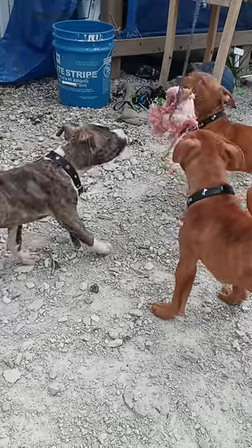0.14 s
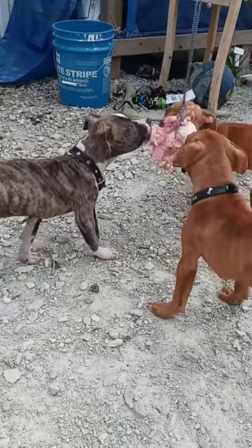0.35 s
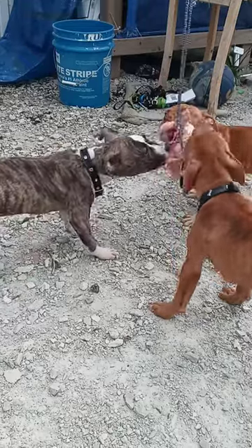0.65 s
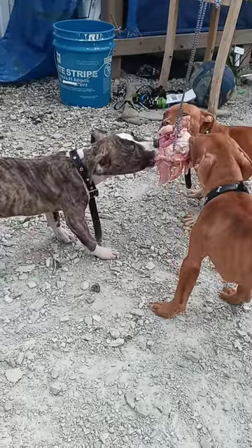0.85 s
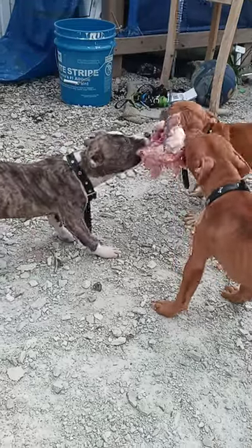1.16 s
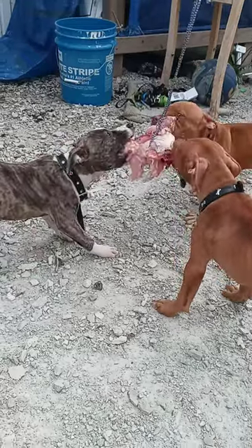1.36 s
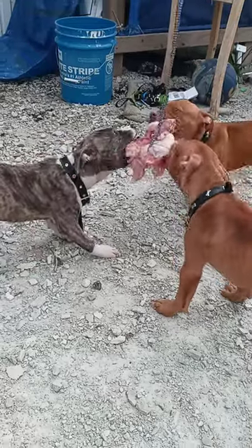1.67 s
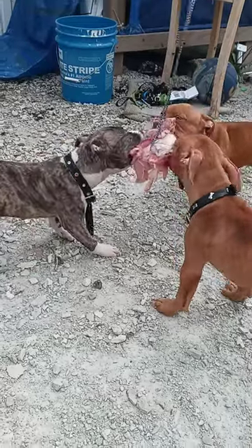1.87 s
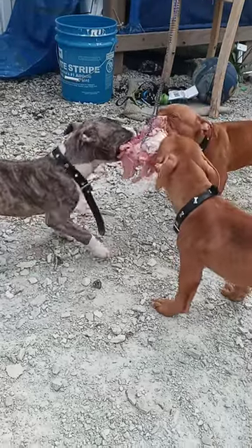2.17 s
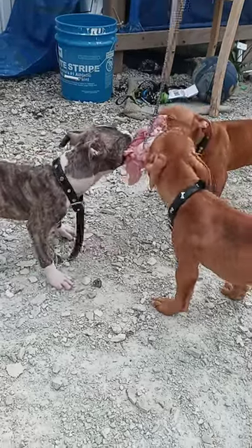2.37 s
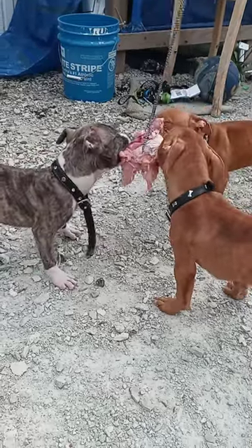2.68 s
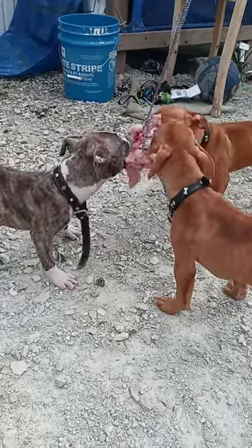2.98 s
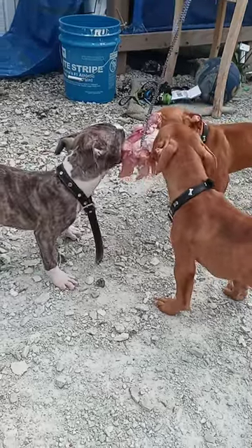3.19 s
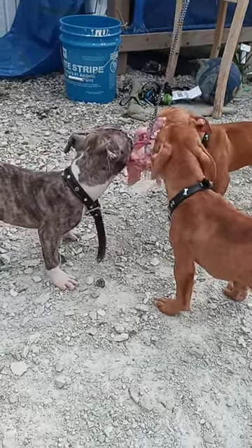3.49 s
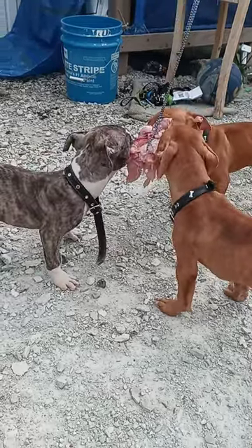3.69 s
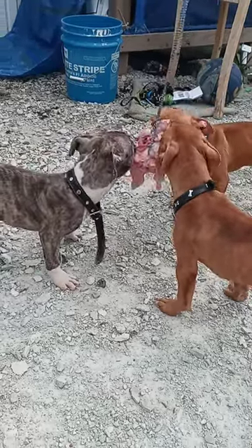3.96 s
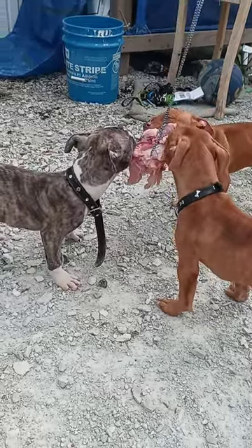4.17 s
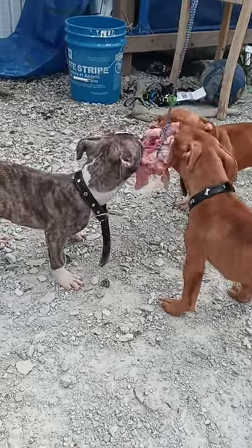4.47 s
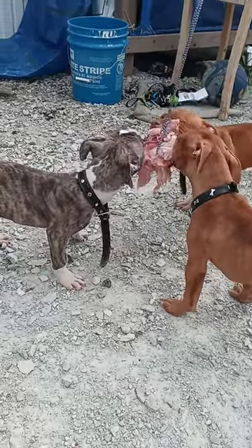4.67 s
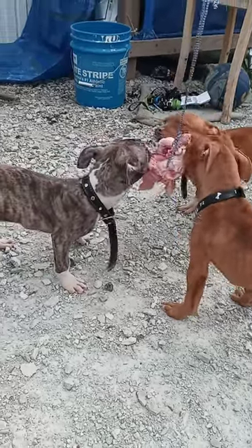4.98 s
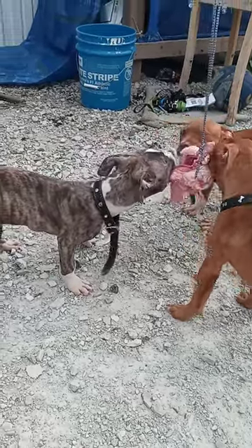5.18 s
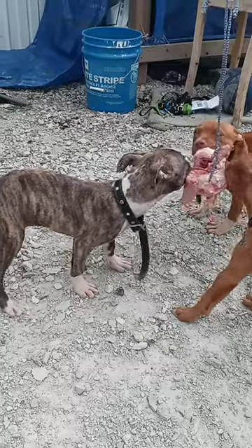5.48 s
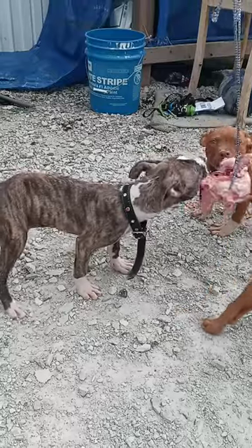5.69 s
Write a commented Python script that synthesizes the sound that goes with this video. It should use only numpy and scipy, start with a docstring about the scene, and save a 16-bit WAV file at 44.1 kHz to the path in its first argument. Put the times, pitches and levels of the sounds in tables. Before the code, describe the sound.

Outdoors, a low lumpy rumble with passing engine drones and a midrange wash continue under close, wet puppy feeding. A busy burst of smacks and rasps comes early, pops cluster around two seconds, and a sharp smack and two chain clinks follow. A loud hollow pop stands out just after three seconds; chewing continues, ending with longer gritty scuffs. The microphone is near, the space open and barely reflective.

```python
"""A far rumble with passing engine drones, a midrange wash and a fine hiss run throughout: shaped noise
and wavering sines. From the start, too, paws rub grit and puppies gnaw and crackle a raw chicken: grains.
Then come smacks (bursts in bands of noise), tearing rasps (clumped grains), mouth pops (short sagging sines)
with bubbling froth, and wet squeaks (bending whistles). Around the middle, the chain that holds the chicken
clinks twice (decaying partials). The yard adds one echo and a short scatter to nearby sounds, save the gnawing."""
import sys
import numpy as np
from scipy import signal
from scipy.fft import rfft, irfft
from scipy.io import wavfile
from scipy.ndimage import uniform_filter1d

SR = 44100
rng = np.random.default_rng(int(sys.argv[2]) if len(sys.argv) > 2 else 0)


def log_audio(samples):
    """Write samples as a 16-bit WAV file to the path given in sys.argv[1]."""
    # one column per channel
    frames = np.atleast_2d(samples).T
    # limit to full scale, then quantise
    limited = np.clip(frames, -1, 1)
    pcm = np.round(limited * 32767).astype(np.int16)
    wavfile.write(sys.argv[1], SR, pcm)


N = 257544
TIME = np.arange(N) / SR  # s

# Spectrum levels are relative; event levels precede the high-pass, yard and microphone colour.
# Far traffic rumble: t/s, level/dB before the rumble trim
RUMBLE_LEVEL = [(0, -44.5), (1, -47.5), (2.2, -45.5), (4.1, -45.5), (5.2, -47), (5.84, -46)]
# Upper edge of the rumble: t/s, rms level/dB
UPPER_RUMBLE_LEVEL = [(0, -67), (1, -76), (2.2, -71.5), (3.1, -63.5), (4.5, -67.5), (5.2, -77), (5.84, -79)]
# Far engines swelling and fading: one end t/s, other end t/s, f/Hz, rms level/dB at full swell before throb
ENGINE_DRONES = [(0.55, 0.28, 119, -53), (0.43, .65, 99, -52.5), (1.4, 1.1, 153, -57), (0.8, 1.12, 98, -56),
                 (1.7, 1.6, 101.5, -47.5), (2.06, 2.29, 100, -52), (1.7, 2.9, 152.5, -55),
                 (1.9, 2.6, 150, -57), (3, 3.3, 100.4, -52), (1.5, 3.7, 176.5, -56),
                 (3.5, 4.67, 131.5, -47.5), (3.5, 4.0, 139.5, -47.5), (3.5, 5.25, 65, -58.5),
                 (4, 5.02, 176, -52.5), (5, 6, 130, -60), (3.5, 6.8, 100, -62)]
# Spectrum of the rumble: f/Hz, level/dB
RUMBLE_SPECTRUM = [(20, -39), (40, -19.5), (65, -5.5), (110, 1), (170, -1), (250, -6), (350, -13.5),
                   (500, -34), (800, -46), (2000, -81)]
# Distant midrange wash: t/s, rms level/dB
WASH_LEVEL = [(0.0, -52), (1.97, -54), (2.52, -52), (3.76, -53), (4.18, -52), (5.61, -54), (5.84, -52.5)]
# Dull lower edge of the wash: t/s, rms level/dB
DULL_LEVEL = [(0, -66.5), (.45, -71), (.7, -73), (1.9, -68), (2.25, -66), (2.55, -62.5), (2.9, -73),
              (3.3, -72.5), (4.1, -71.5), (4.6, -84), (5.2, -65), (5.45, -85), (5.84, -82)]
# Spectrum of the midrange air: f/Hz, level/dB
AIR_SPECTRUM = [(300, -41), (600, -15), (760, -7), (930, 6), (1500, 3.5), (1750, 4), (2050, -7.5),
                (2550, -12.5), (2900, -8), (4300, -15.5), (7000, -37), (11000, -67)]
# Spectrum of the fine hiss: f/Hz, level/dB
HISS_SPECTRUM = [(1500, -30), (4000, -10), (5500, -6), (7000, -4), (8000, 2), (9000, -2), (9800, -9),
                 (10600, -14), (16000, -15)]
# Grit shifting under paws: t/s, level/dB before the shuffle boost
GRIT_LEVEL = [(0.0, -62.5), (0.49, -56.5), (0.68, -63.5), (0.97, -65), (1.69, -63.5), (2.03, -76),
              (2.26, -63), (2.36, -60.5), (2.96, -70.5), (3.38, -62.5), (3.66, -79), (3.89, -69),
              (4.31, -63), (4.49, -70), (5.19, -65.5), (5.45, -61), (5.66, -60), (5.84, -58)]
# Spectrum of the grit: f/Hz, level/dB
GRIT_SPECTRUM = [(1500, -32), (3000, -5.5), (6000, 0), (9000, 0.5), (12000, 1), (16000, 5.5)]
# Wet rustle of gnawing, with lulls between bouts: t/s, rms level/dB
GNAWING_LEVEL = [(.1, -60.5), (.25, -68), (.45, -59), (.55, -78), (.8, -67), (1.02, -67), (1.18, -63),
                 (1.3, -59), (1.44, -70), (1.68, -59), (1.83, -69), (1.93, -60), (2.04, -57.5), (2.11, -69),
                 (2.22, -62), (2.65, -65), (2.9, -66), (3.06, -61), (3.3, -59.5), (3.48, -73), (3.9, -60.5),
                 (4.15, -63), (4.35, -65), (4.55, -62.5), (4.9, -56.5), (5.1, -65.5), (5.42, -59),
                 (5.84, -70)]
# Spectrum of that rustle: f/Hz, level/dB
RUSTLE_SPECTRUM = [(1700, -28), (2350, -3), (2900, 0), (3600, -3.5), (4400, -6), (6500, -6), (10000, -17),
                   (16000, -42)]
# Smacks of lips, teeth and gristle: t/s, short-term peak level/dB before trim, centre f/Hz, spread/octaves each way
LIP_SMACKS = [(0.057, -46, 4450, 0.71), (.3426, -40, 9000, .6), (0.346, -36, 2500, 1.1),
              (0.3685, -34.5, 6000, 1.1), (.3835, -37, 7000, 1), (0.4238, -33.5, 5900, 0.68),
              (0.447, -33, 8300, 0.76), (.467, -49, 8500, 1), (0.4954, -39.5, 6300, 0.24),
              (.5741, -43, 9200, 0.55), (0.6608, -41.5, 3300, .9), (.6695, -42, 5000, 0.55),
              (0.6813, -39, 6700, 0.27), (0.862, -45, 5200, 0.69), (0.9667, -47, 5000, 0.61),
              (1.229, -44.5, 7200, .4), (1.2346, -33.5, 3180, 0.49), (1.3493, -46, 4560, .4),
              (1.3624, -42, 2700, .7), (1.362, -38.5, 6200, 0.38), (1.3785, -43, 6600, .5),
              (1.4187, -48, 4300, 0.62), (1.466, -49, 4900, 0.53), (1.4895, -44, 8240, .6),
              (1.526, -41.5, 4270, 0.36), (1.593, -35.5, 7000, 0.47), (1.723, -42.5, 4400, 0.38),
              (1.774, -47.5, 4200, 1), (1.9684, -44, 3830, 0.65), (1.974, -38.5, 6670, 0.57),
              (2.0337, -49, 3200, .6), (2.234, -43, 4600, .8), (2.291, -47, 3700, .4),
              (2.481, -40, 3770, 0.33), (2.5414, -25, 6200, 1.03), (2.5407, -36.5, 1260, 0.52),
              (2.6, -31.5, 8900, 0.37), (2.722, -35.5, 9600, .22), (2.781, -38, 8500, .4),
              (2.860, -41, 10500, 0.44), (2.9842, -35, 4000, 1.34), (3.0945, -47, 5000, .7),
              (3.1614, -35, 5370, 0.91), (3.2216, -36, 6230, .5), (3.2986, -48, 3700, 0.69),
              (3.455, -45, 5500, 1.1), (3.5404, -47, 8100, 0.42), (3.6935, -46.5, 3300, 0.36),
              (3.6413, -43.5, 7000, 0.46), (3.706, -38, 6700, 0.3), (3.885, -44, 4600, 0.7),
              (3.9404, -40.5, 4860, 0.56), (3.977, -40.5, 6400, 0.96), (4.061, -40.5, 8900, 0.41),
              (4.0813, -31.5, 4200, 1.8), (4.082, -37.5, 4700, 0.15), (4.123, -45, 4000, 0.88),
              (4.212, -44.5, 3800, 0.31), (4.2457, -53, 3200, .3), (4.358, -45, 5440, 0.22),
              (4.3897, -42.5, 4970, 0.62), (4.4537, -47, 4800, 0.082), (4.4628, -44, 9340, .2),
              (4.7658, -36, 5100, 0.25), (4.844, -43.5, 6340, 0.62), (4.9127, -49, 6300, 0.27),
              (4.9407, -35, 4670, 1.7), (5.053, -43, 6000, 1.1), (5.2357, -42, 6100, 0.35),
              (5.2552, -41.5, 7600, .8), (5.2932, -42, 5200, 1.2), (5.3051, -34, 5300, 0.46),
              (5.321, -42, 6200, 1.1), (5.6695, -35, 8700, 0.28), (5.746, -38, 6300, 1.4),
              (5.792, -44, 4200, .6)]
# Tearing meat and scuffed grit: t/s, length/s, rms level/dB, centre f/Hz, spread/octaves each way
TEARING_RASPS = [(.328, .066, -54.5, 1150, 0.4), (0.334, 0.037, -47, 5600, 1.1),
                 (0.368, 0.033, -45, 5600, 1.2), (0.354, 0.14, -66, 650, 0.4),
                 (0.39, 0.016, -50, 5500, 1.2), (0.408, 0.03, -52.5, 7000, .9),
                 (0.662, 0.031, -52, 5030, 0.5), (.815, 0.022, -53.5, 10000, .6),
                 (0.828, 0.051, -53.5, 4440, 0.4), (1.233, 0.023, -54.5, 1200, 0.42),
                 (1.239, .015, -58, 2900, 0.72), (1.255, .012, -47.5, 6000, 1.2),
                 (1.266, 0.014, -53, 7600, .6), (1.679, 0.048, -55.5, 4000, .8),
                 (1.761, 0.026, -52, 4970, 0.71), (2.185, 0.021, -51, 6500, 1.1),
                 (2.262, 0.028, -47, 9500, 0.68), (2.553, 0.014, -52, 4200, 1),
                 (2.714, .012, -51, 10500, .25), (2.85, 0.016, -53, 10500, .45),
                 (3.168, 0.02, -54.5, 3900, 0.5), (3.224, 0.023, -59, 6000, 0.56),
                 (3.273, 0.017, -59.5, 2950, 0.22), (3.297, .02, -55.5, 3800, 0.55),
                 (3.82, 0.031, -54.5, 5000, 1.1), (4.266, 0.044, -56, 3600, 0.31),
                 (4.359, 0.033, -60, 5600, 0.5), (4.44, 0.043, -59.5, 1620, 0.16),
                 (4.774, 0.026, -49, 5070, 0.3), (4.792, 0.088, -58.5, 5000, 0.55),
                 (1.413, 0.021, -59, 4300, .6), (4.936, 0.036, -59, 4500, .8),
                 (5.302, 0.023, -52, 3000, 1.4), (5.655, 0.1, -51.5, 6500, 1.2),
                 (5.727, 0.25, -53.5, 5450, 1.2)]
# Hollow pops as suction lets go in a mouth: t/s, level/dB at full swell, cavity f/Hz, swell time/s
MOUTH_POPS = [(.6605, -46, 2860, .0016), (.778, -48, 3050, 0.0016), (0.785, -49, 3060, 0.0019),
              (1.2351, -32.5, 2960, 0.0011), (1.8991, -35.5, 1307, 0.0038), (1.9139, -34, 1230, 0.0013),
              (1.9152, -43, 3030, 0.0012), (1.9343, -36.5, 1270, 0.0014), (1.9338, -45, 2770, .0012),
              (2.182, -44.5, 2800, 0.0019), (2.3395, -38, 1380, 0.0019), (2.3464, -33, 1290, 0.0018),
              (2.5409, -33, 1190, 0.0012), (3.148, -40.5, 1440, 0.0025), (3.1593, -19.5, 1433, 0.0022),
              (3.172, -42, 1560, .0026), (3.864, -46, 2940, .0016), (3.977, -40.5, 1340, 0.0036),
              (4.0815, -41, 2420, 0.0012), (4.389, -35.5, 1400, 0.0026), (4.407, -45, 1440, 0.0037),
              (4.724, -44, 3400, 0.0022)]
# Air sucked past the meat: t/s, length/s, rms level/dB, start f/Hz, middle f/Hz, end f/Hz
WET_SQUEAKS = [(.728, .046, -61, 4400, 4400, 3850), (.776, .032, -62, 4100, 4600, 4900),
               (3.105, 0.035, -61, 4050, 4450, 4200)]
# Chain clinks as it is tugged: t/s, peak level/dB
CHAIN_CLINKS = [(2.7595, -22.5), (3.222, -36)]
# Partials of a chain link: f/Hz, relative level/dB, 60 dB decay time/s
LINK_PARTIALS = [(4840, -15, 0.047), (6250, -6, 0.058), (8050, -3, .033), (9507, -10, 0.023),
                 (11700, 2, .024), (15200, -2, .015)]
# Microphone colour on the nearby sounds: f/Hz, level/dB
MICROPHONE_COLOUR = [(1700, 3.5), (2350, 0.5), (2900, 5.5), (4200, -1.5), (7000, -1.5), (8300, 2),
                     (10000, -3), (16000, -7.5)]


def amp(db):
    """Turns decibels into gain."""
    return 10 ** (np.asarray(db) / 20)


def evened(x):
    """Scales a sound to rms 1."""
    return x / np.sqrt(np.mean(x ** 2) + 1e-20)


def curve(rows):
    """Joins (t/s, value) rows by straight lines."""
    return np.interp(TIME, *np.transpose(rows))


def add(mix, s, sound):
    """Mixes a sound in at time s, cut off at the end of the mix."""
    part = mix[max(round(s * SR), 0):][:len(sound)]
    part += sound[:len(part)]


def drift(per_s):
    """Slow random wander of rms 1, from noise smoothed above about per_s Hz."""
    count = N // 32  # a coarse time grid is enough
    smoothing = np.exp(-(np.fft.rfftfreq(count, N / count / SR) / per_s) ** 2)
    slow = irfft(rfft(rng.standard_normal(count)) * smoothing, count)
    return np.interp(TIME, np.linspace(0, N / SR, count), evened(slow))


def colour(x, points):
    """Filters by a (f/Hz, level/dB) spectrum, drawn straight over log frequency."""
    hz, db = np.transpose(points)
    log_bins = np.log(np.fft.rfftfreq(N, 1 / SR) + 1)
    return irfft(rfft(x) * amp(np.interp(log_bins, np.log(hz), db)), N)


def noise(points):
    """Noise of rms 1 with a (f/Hz, level/dB) spectrum."""
    return evened(colour(rng.standard_normal(N), points))


def band(x, hz, octaves, order=1):
    """One resonance, steeper with its order; appended silence lets it ring out."""
    ratio = 2 ** (abs(octaves) + .05)  # slightly widened, so no band is too narrow
    edges = np.clip([hz / ratio, hz * ratio], [50, 100], [SR * .4, SR * .48])
    sos = signal.butter(order, edges, "bandpass", fs=SR, output="sos")
    return signal.sosfilt(sos, np.pad(x, (0, 256)))


def thin(x, hz):
    """High-pass: tiny sources radiate no bass."""
    return signal.sosfilt(signal.butter(2, hz, "highpass", fs=SR, output="sos"), x)


def grains(size, per_s, spread_db):
    """Sparse clicks of random sign, a few much larger than the rest."""
    chance, sign, large = rng.random((size, 3)).T
    sizes = amp(spread_db * np.minimum(-np.log(1 - large), 4))
    return (chance < per_s / SR) * np.sign(sign - .5) * sizes


def gritty(points, per_s, spread_db):
    """A dense run of separate grains, of rms 1, with a (f/Hz, level/dB) spectrum."""
    return evened(colour(grains(N, per_s, spread_db), points))


def patchy(x, depth_db, hold_s, width_hz):
    """Lets patches of the spectrum swell and sink independently; returns rms 1."""
    spectra = signal.stft(x, nperseg=512, noverlap=384)[2]  # frames step by 128 samples
    field = rng.standard_normal(spectra.shape)
    field = uniform_filter1d(field, max(round(hold_s * SR / 128), 1), axis=1)
    field = uniform_filter1d(field, max(round(width_hz * 512 / SR), 1), axis=0)
    spectra = spectra * amp(depth_db * evened(field))
    return evened(signal.istft(spectra, nperseg=512, noverlap=384)[1][:N])


def traffic(rumble_db=-2, patchy_db=2, throb_db=1.1, upper_hz=390):
    """A low, lumpy rumble in which wavering engine drones come and go."""
    rumble = patchy(noise(RUMBLE_SPECTRUM), depth_db=patchy_db, hold_s=0.06, width_hz=90)
    upper = evened(band(rng.standard_normal(N), upper_hz, 0.27, order=2)[:N])
    out = amp(rumble_db + curve(RUMBLE_LEVEL)) * rumble + amp(curve(UPPER_RUMBLE_LEVEL)) * upper
    for start, end, hz, db in ENGINE_DRONES:
        progress = np.clip((TIME - start) / (end - start), 0, 1)  # either end may come first
        passing = np.sqrt(np.sin(np.pi * progress) + 1e-9)
        turns = np.cumsum(hz * (1 + .008 * drift(4))) / SR
        throb = amp(throb_db * drift(4.0))
        out += amp(db) * throb * passing * np.sqrt(2) * np.sin(2 * np.pi * turns)
    return out


def wash(dull_hz=600, dull_octaves=0.51, hiss_db=-62):
    """Distant midrange wash with a dull lower edge, plus a fine hiss; air and hiss waver in patches."""
    air = patchy(noise(AIR_SPECTRUM), depth_db=2.5, hold_s=.06, width_hz=260)
    hiss = patchy(noise(HISS_SPECTRUM), depth_db=2.5, hold_s=.07, width_hz=600)
    dull = evened(band(rng.standard_normal(N), dull_hz, dull_octaves, order=2)[:N])
    return amp(curve(WASH_LEVEL)) * air + amp(curve(DULL_LEVEL)) * dull + amp(hiss_db) * hiss


def shuffle(level_db=8.5, clump_db=3.5, clumps_per_s=90, shift_db=2, shifts_per_s=7):
    """Many sand grains rub under the paws in uneven clumps of shifting colour, swelling as weight shifts."""
    grit = gritty(GRIT_SPECTRUM, per_s=3000, spread_db=2)
    fizz = patchy(grit, depth_db=3, hold_s=.04, width_hz=1000)
    unevenness = amp(clump_db * drift(clumps_per_s) + shift_db * drift(shifts_per_s))
    return amp(level_db + curve(GRIT_LEVEL)) * evened(fizz * unevenness)


def gnawing(patchy_db=3.5, clump_db=3.0, clumps_per_s=70):
    """Wet meat crackles on teeth and gums in uneven clumps whose colour keeps shifting."""
    fibres = gritty(RUSTLE_SPECTRUM, per_s=1500, spread_db=2.5)
    rustle = patchy(fibres, depth_db=patchy_db, hold_s=.035, width_hz=400)
    return amp(curve(GNAWING_LEVEL)) * evened(rustle * amp(clump_db * drift(clumps_per_s)))


def chewing(idle_db=-67.5, bite_db=-61, lead_s=0.005, bite_s=0.018):
    """Gain of the wet crackle: it jumps as the jaws work at each smack or pop, then trails off."""
    working = np.zeros(N)
    for s, *_ in LIP_SMACKS + MOUTH_POPS:
        distance = np.maximum((s - TIME) / lead_s, (TIME - s) / bite_s)
        working = np.maximum(working, np.exp(-distance))
    return amp(idle_db) + amp(bite_db) * working


def crackle(per_s=14, decay=0.0016, octaves=0.23, tilt_db=-1):
    """Small wet ticks go on throughout: sixteen short fizzes, each with its own pitch, strike at random."""
    out, t = np.zeros(N), np.arange(SR // 60) / SR
    for octave in np.linspace(0, 1.8, num=16):
        snaps = rng.standard_normal(len(t)) * (1 - np.exp(-t / decay)) * np.exp(-t / decay)
        fizz = evened(band(snaps, 2900 * 2 ** octave, octaves, order=2))
        tick = amp(tilt_db * octave) * fizz  # tilt in dB per octave
        out += signal.oaconvolve(grains(N, per_s, 2.2), tick)[:N]
    return chewing() * evened(thin(out, 3240))


def smacks(level_db=-3.5, rise=0.00015, decay_s=0.004, low_hz=800, uneven_db=5.5, skirt_db=-13):
    """A wet film breaks in a quick run of uneven snaps that stops short, ringing in the mouth."""
    out, t = np.zeros(N), np.arange(SR // 30) / SR
    for s, db, hz, octaves in LIP_SMACKS:
        fizz, size = rng.standard_normal((2, len(t)))
        envelope = (1 - np.exp(-t / rise)) * np.exp(-(t / decay_s) ** 2)
        snaps = fizz * amp(uneven_db * size) * envelope
        skirt = amp(skirt_db) * band(snaps, hz, 0.88)  # a little escapes through gentler slopes
        sound = band(snaps, hz, octaves, order=2) + skirt
        peak = np.sqrt(uniform_filter1d(sound ** 2, size=88).max())  # loudest 2 ms
        add(out, s, amp(db) * sound / peak)
    return amp(level_db) * thin(out, low_hz)


def rasps(per_s=2800, spread_db=3, low_hz=550):
    """Fibres and grit give way in dense clumps of grains."""
    out = np.zeros(N)
    clumps = amp(3 * drift(160))
    for s, length, db, hz, octaves in TEARING_RASPS:
        swell = clumps[round(s * SR):][:round(length * SR)]
        envelope = swell * signal.windows.tukey(len(swell), .5)
        source = grains(len(swell), per_s, spread_db) * envelope
        add(out, s, amp(db) * evened(band(source, hz, octaves, order=2)))
    return thin(out, low_hz)


def pops(sag=0.024, sputter=0.15, spit_db=-27, spit_hz=3800, spit_octaves=0.82, low_hz=700):
    """The mouth cavity rings briefly, its pitch sagging as it widens; saliva makes it sputter and spit."""
    out, t = np.zeros(N), np.arange(SR // 40) / SR
    for s, db, hz, swell in MOUTH_POPS:
        u = t / swell
        turns = np.cumsum(hz * (1 - sag * np.tanh(u - 1))) / SR
        flutter, spray = rng.standard_normal((2, len(t)))
        wobble = sputter * evened(uniform_filter1d(flutter, size=60))  # radians
        ring = np.sin(2 * np.pi * turns + wobble)
        spit = amp(spit_db) * evened(band(spray, spit_hz, spit_octaves, order=2)[:len(t)])
        envelope = u * np.exp((1 - u ** 2) / 2)  # reaches 1 at the swell time
        add(out, s, amp(db) * envelope * (ring + spit))
    return thin(out, low_hz)


def squelches(level_db=-19, limit_db=-35, delay_s=.01, octaves=0.29, ragged_db=4, small_db=-5):
    """After each pop, saliva bubbles on raggedly in the same cavity, less so in a small one."""
    out, t = np.zeros(N), np.arange(SR // 15) / SR
    ragged = amp(ragged_db * drift(250))
    envelope = t / delay_s * np.exp(1 - t / delay_s)
    for s, db, hz, _ in MOUTH_POPS:
        froth = rng.standard_normal(len(t)) * ragged[round(s * SR):][:len(t)]
        bubbling = evened(band(froth, hz, octaves, order=2)[:len(t)])
        octaves_up = np.log2(hz / 1000)  # a smaller cavity sounds higher
        # pops louder than the limit stir up no more saliva
        gain = amp(min(db, limit_db) + level_db + small_db * octaves_up)
        add(out, s, gain * envelope * bubbling)
    return out


def squeaks(waver=0.027, flutter_db=3):
    """Thin, fluttering whistles whose pitch bends as the wet gap changes size."""
    out = np.zeros(N)
    unsteady, flutter = 1 + waver * drift(300), amp(flutter_db * drift(150))
    for s, length, db, *path_hz in WET_SQUEAKS:
        u = np.linspace(0, 1, round(length * SR))
        now = round(s * SR) + np.arange(len(u))
        turns = np.cumsum(np.interp(u, [0, .5, 1], path_hz) * unsteady[now]) / SR
        envelope = signal.windows.tukey(len(u), .5) * flutter[now]
        add(out, s, amp(db) * evened(envelope * np.sin(2 * np.pi * turns)))
    return out


def chain():
    """Two links touch and ring briefly, each partial dying at its own rate."""
    out, t = np.zeros(N), np.arange(SR // 12) / SR
    ring = sum(amp(db - 60 * t / t60) * np.sin(2 * np.pi * hz * t) for hz, db, t60 in LINK_PARTIALS)
    for s, db in CHAIN_CLINKS:
        add(out, s, amp(db) * ring / abs(ring).max())
    return out


def yard(x, echo_db=-22, echo_s=0.006, scatter_db=-16, t60=0.052):
    """One echo off the nearby wall and a short scatter from gravel and clutter."""
    t = np.arange(SR // 4) / SR
    tail = grains(len(t), 1900, 0.66) * amp(-60 * t / t60) * (1 - np.exp(-t / 0.012))
    response = amp(scatter_db) * tail / np.linalg.norm(tail)
    add(response, echo_s, amp([echo_db]))
    return x + signal.oaconvolve(x, response)[:N]


def scene():
    """The feeding puppies in their yard, over the gnawing, traffic and wash, which skip the yard."""
    mouths = crackle() + smacks() + rasps() + pops() + squelches() + squeaks()
    nearby = colour(yard(shuffle() + mouths + chain()), MICROPHONE_COLOUR)
    return (traffic() + wash() + gnawing() + nearby)[None]


def record(dry, edge_hz=15950):
    """Limits the band with a steep low-pass."""
    lowpass = signal.firwin(511, edge_hz, window=("kaiser", 9), fs=SR)
    return signal.oaconvolve(dry, lowpass[None], "same")


dry = scene()
out = record(dry)
log_audio(out)
```